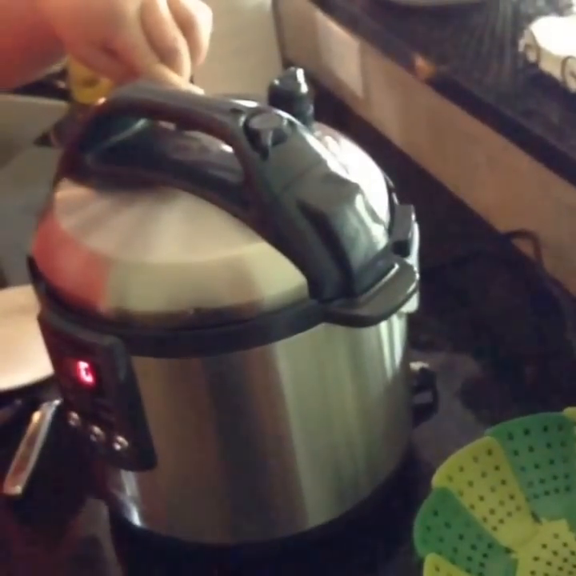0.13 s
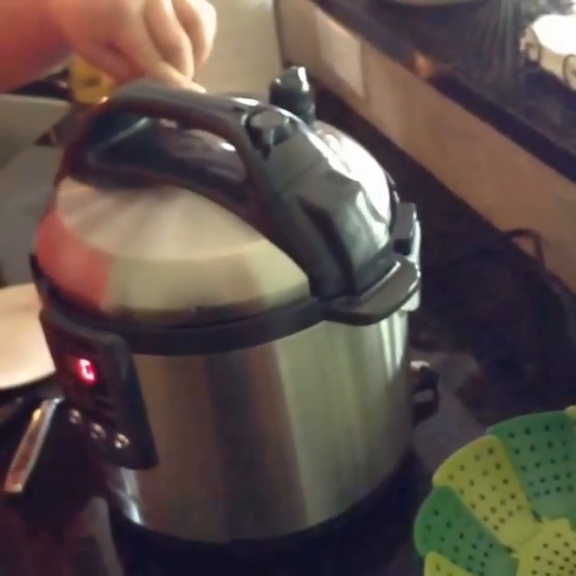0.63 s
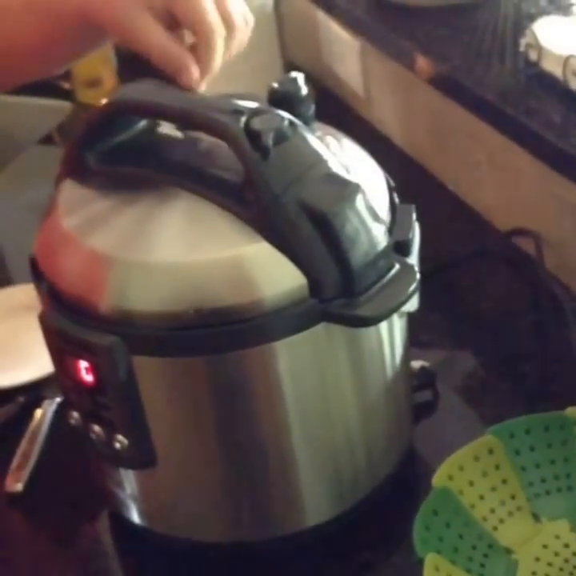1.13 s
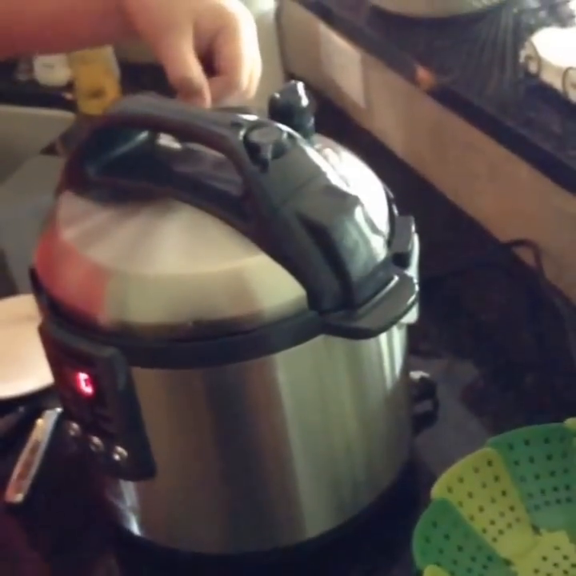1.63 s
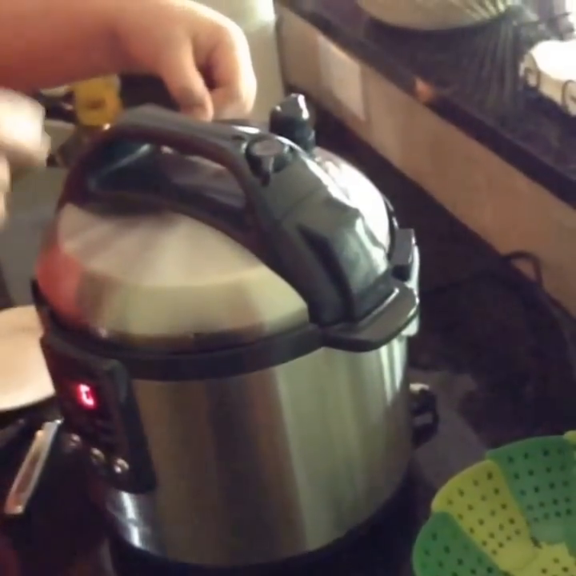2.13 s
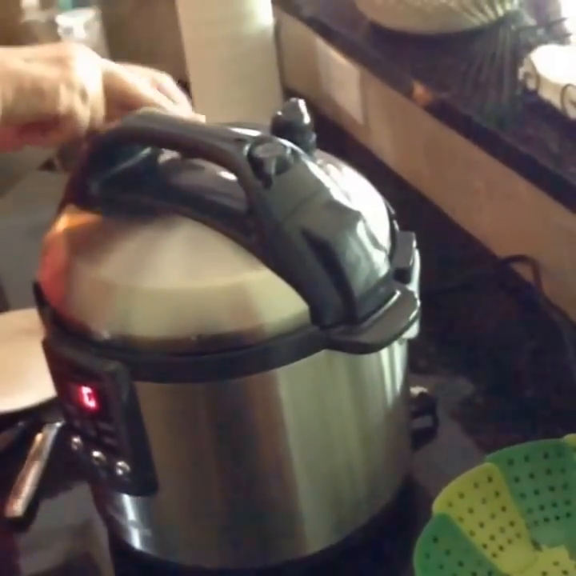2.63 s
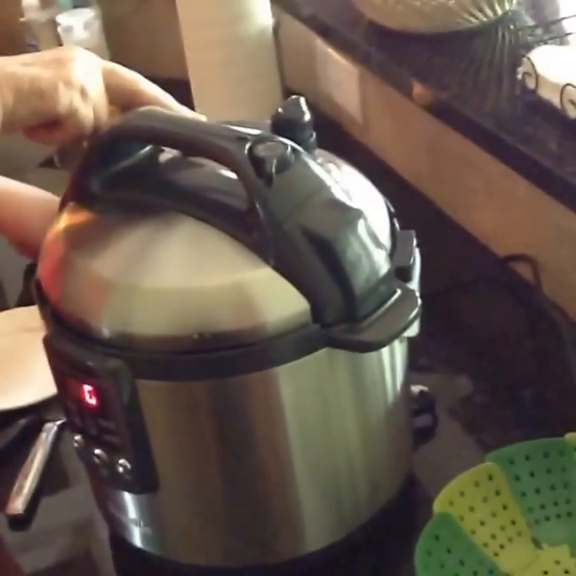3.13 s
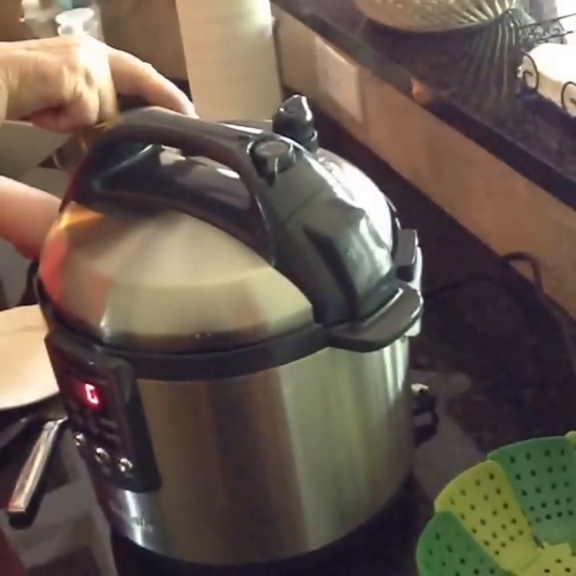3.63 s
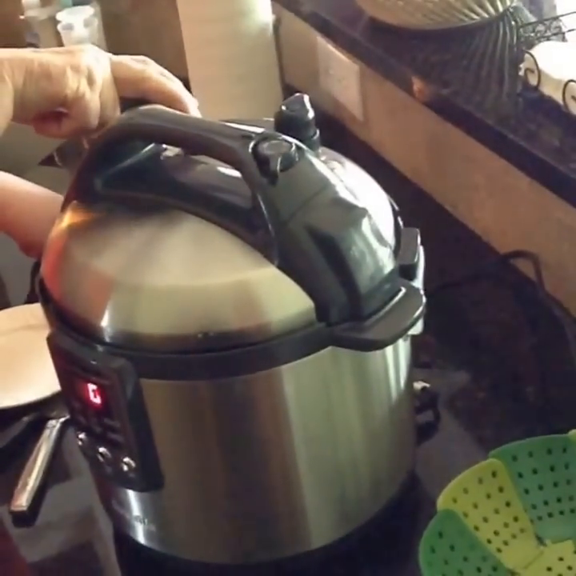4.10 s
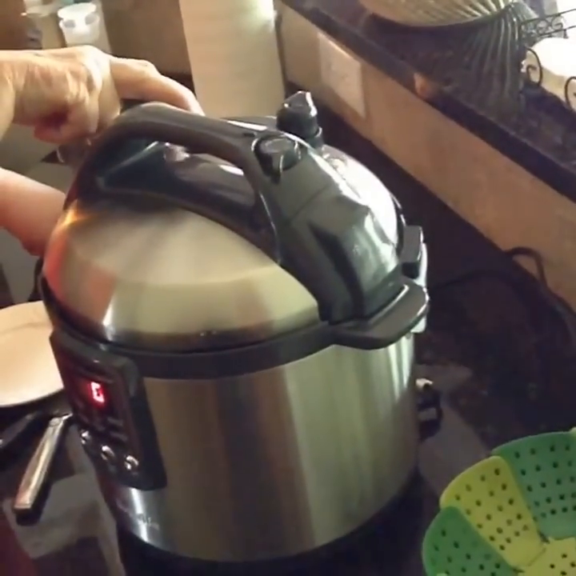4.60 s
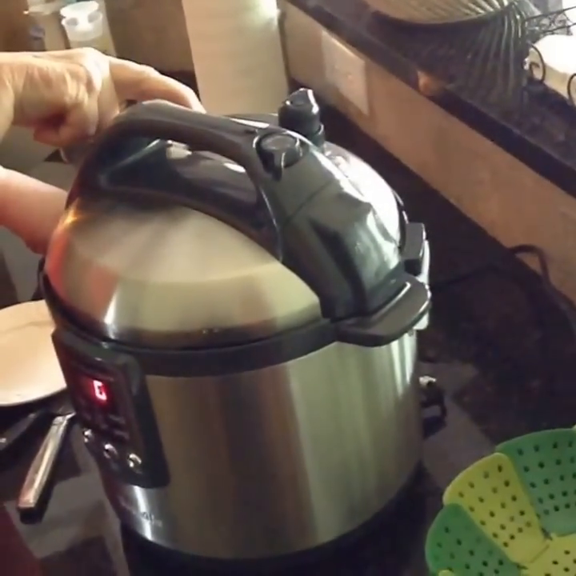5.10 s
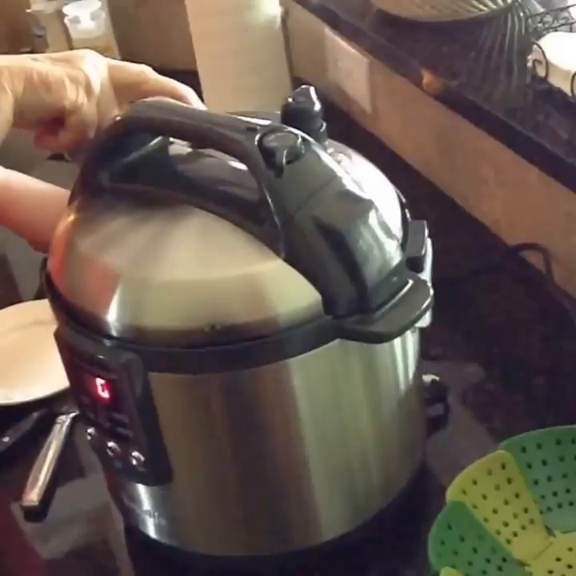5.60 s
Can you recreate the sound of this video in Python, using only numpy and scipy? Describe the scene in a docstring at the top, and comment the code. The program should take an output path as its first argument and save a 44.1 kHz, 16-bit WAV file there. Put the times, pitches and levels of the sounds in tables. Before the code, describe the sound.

Steam hisses loudly from a pressure cooker valve, cuts out twice with a squeak and metallic knocks, then bursts back and continues steadily.

```python
"""A kitchen counter, one microphone: steam blows out of the release valve of a pressure cooker.
The jet is turbulent noise coloured by the valve cap, heard direct, in swaying echoes and as hiss in the room.
Twice a hand shuts the valve for a moment: it squeaks the first time and knocks as ringing metal both times,
the hiss dies away in the room, then bursts out again. Wavering hum lines of an appliance and room tone lie below."""
import sys
import numpy as np
from scipy import signal
from scipy.fft import rfft, irfft, next_fast_len
from scipy.io import wavfile
from scipy.ndimage import uniform_filter1d, map_coordinates

SR = 44100
rng = np.random.default_rng(int(sys.argv[2]) if len(sys.argv) > 2 else 0)


def materialize(psi):
    """Save the field psi as 16-bit PCM at rate SR to the path in sys.argv[1].

    A 1-D psi becomes a single channel; in a 2-D psi each row is a channel.
    """
    bounded = np.clip(np.atleast_2d(psi).T, -1, 1)
    quanta = np.round(bounded * 32767).astype(np.int16)
    wavfile.write(sys.argv[1], SR, quanta)


def undo_db(level):
    """Turn decibels back into plain size, where 20 dB means ten times bigger."""
    steps = np.asarray(level, float) / 20
    return 10 ** steps


N = 253134   # length in samples

# spectrum of the steam jet: frequency_hz, relative_level_db (per Hz)
JET_SPECTRUM = [(300, -63), (600, -30), (940, -22.5), (1150, -23), (1720, -16.5), (2470, -15.5), (3200, -9),
                (3900, -5), (5000, -7.5), (6500, -6), (8100, -3), (9300, -4), (10300, -5), (11000, -17),
                (14000, -51)]
# resonances and notches of the valve cap, which sits differently at each opening:
# centre_hz, width_hz, first_opening_db, second_opening_db, third_opening_db
CAP_RESONANCES = [(2100, 76, 1, 0.5, 4.5), (2746, 89, 10.5, 2, 3.5), (3370, 150, 6, 6.5, 5),
                  (3530, 120, 3.5, 4.5, 0), (4010, 270, 1.5, 4, 4.5), (4470, 320, -6, -8.5, -10),
                  (4760, 92, -1, 8.5, 5.5), (5210, 300, 6, 2.5, 1.5), (5880, 310, 3, 4.5, 5.5),
                  (6380, 400, 0, -1.5, -1), (7480, 430, 6.5, 2, 3.5), (8160, 450, -1.5, 5, 5),
                  (8830, 150, 5, 3.5, 0.5), (9570, 220, -13, 3, -1.5), (9800, 240, 7, 6.5, 2.5)]
# spectrum of the steam reflected by the walls against the direct jet: frequency_hz, relative_level_db
WALL_SPECTRUM = [(800, 0), (1500, -0.5), (2600, 0), (3300, -0.5), (6500, 1), (10500, 2.5)]
# the valve stands open three times: opens_s, shuts_s, jet_db (before sag and surge),
# roar_lean_db (bands below 4.5 kHz, less in the bass), rush_lean_db (bands from 4.5 to 7 kHz)
VALVE_OPENINGS = [(-1, 1.052, -35.7, -1.5, -1.8), (1.349, 2.306, -35.4, -0.4, 0),
                  (2.568, 7, -35.6, -0.1, -1.4)]
# pent-up steam bursts out at each reopening: start_s, rise_s, hold_s, fall_s, boost_db
STEAM_SURGES = [(1.36, .045, .085, .07, 2.8), (2.575, .015, .1, .15, 2.3)]
# nearby surfaces that move with hand and microphone: delay_s, sway_s (rms), level_db
NEAR_ECHOES = [(.0013, .00004, -12), (.0031, 0.000056, -14), (.0067, .0001, -9)]
# reverberation time of the kitchen: frequency_hz, t60_s
ROOM_DECAY = [(200, 0.42), (1000, 0.56), (2000, 0.9), (3000, 0.38), (4000, 0.38), (6500, 0.44),
              (10000, 0.3)]
# spectrum of the room tone: frequency_hz, relative_level_db (per Hz)
ROOM_SPECTRUM = [(30, -30), (65, -22), (100, -8.5), (160, -2.5), (215, -4), (300, -1), (450, -8.5),
                 (700, -5.5), (1000, -12), (1500, -20), (2500, -24), (4600, -10), (8000, -23.5),
                 (11000, -20)]
# hum lines of the appliance: pitch_hz, level_db (before its wavering), wander_hz (rms)
HUM_LINES = [(121, -68, 1.25), (225.8, -67.5, 11.5)]
# squeak of the valve as it is turned: time_s, pitch_hz, level_db (both before the roughness)
SQUEAK_GLIDE = [(1.016, 613, -77), (1.019, 639, -49.5), (1.04, 548, -45.5), (1.06, 470, -47.5),
                (1.07, 440, -65)]
# the valve weight knocking on its seat: time_s, peak_db, favoured_centre_hz, bounces (count)
VALVE_KNOCKS = [(1.067, -32.5, 700, 0), (1.071, -39, 300, 0), (1.084, -37, 300, 3), (1.177, -43, 284, 0),
                (1.349, -45, 270, 0), (2.331, -35, 650, 0), (2.336, -38, 400, 2), (2.556, -33.5, 950, 0),
                (2.572, -34.5, 1330, 0), (2.593, -40, 400, 2)]
# modes that lid and valve ring with: pitch_hz, relative_level_db, t60_s
LID_MODES = [(212, -9, 0.075), (273, -2, 0.052), (333, -1.5, 0.047), (393, -7, 0.07), (542, -7, 0.06),
             (628, -6, 0.038), (723, -8.5, 0.055), (820, -9.5, 0.058), (918, -4, 0.03), (1125, -15, 0.022),
             (1420, -15, 0.028), (1790, -6, .025), (2500, -2, 0.017), (3800, 4, .015), (4500, -6, .01)]

ATTACK_S = .019   # the jet reaches full flow
# pressure falls: the whole jet sags, while the roar and still more the rush gain on the top treble
SAG_DB_PER_S, ROAR_LEAN_DB_PER_S, RUSH_LEAN_DB_PER_S = .42, .1, .65
OPENING_ROAR_DB, OPENING_RUSH_DB, OPENING_FADE_S = 7.5, 5, .125   # a half-open valve favours the middle
# the gap narrows before it seals: the jet swells, most in the middle, and eases at the very end
NARROWING_S, EASING_S, NARROW_DB, NARROW_ROAR_DB, NARROW_RUSH_DB = .05, .02, 2.2, 7, 5
BOUNCE_GAP_S, BOUNCE_LOSS_DB, BOUNCE_HZ = .018, 4, 560   # bounces follow evenly, weaker, near one centre


def at_hz(points, hz):
    """Reads a spectrum table on a log-frequency axis."""
    table_hz, values = np.transpose(points)
    return np.interp(np.log(hz), np.log(table_hz), values)


def rms_one(x):
    """Scales to rms 1."""
    return x / np.sqrt(np.mean(x ** 2) + 1e-20)


def drift(rate_hz):
    """Slow chance of spread 1: noise smoothed to about rate_hz changes a second."""
    pole = np.exp(-80 * np.pi * rate_hz / SR)   # one value every 40 samples
    noise = rng.standard_normal(N // 40 + 2002)
    slow = signal.lfilter([1], [1, -2 * pole, pole * pole], noise)[2000:]
    return np.interp(np.arange(N) / 40, np.arange(len(slow)), rms_one(slow))


def frequency_axis(size):
    """Frequencies of a real spectrum in Hz, kept just above zero for the logarithm."""
    return np.arange(size // 2 + 1) * SR / size + 1e-3


def coloured(gain_db, size):
    """White noise given a gain in dB per frequency; rms 1."""
    return rms_one(irfft(rfft(rng.standard_normal(size)) * undo_db(gain_db), size))


def jet_controls():
    """Flow, and the lean of roar and rush in dB: open, surge, sag with pressure, narrow, shut."""
    t = np.arange(N) / SR
    surge_db = 0
    for start, rise, hold, fall, db in STEAM_SURGES:
        surge_db = surge_db + np.interp(t, np.cumsum([start, rise, hold, fall]), [0, db, db, 0])
    flow, roar_db, rush_db = np.zeros((3, N))
    for opens, shuts, jet_db, roar_lean_db, rush_lean_db in VALVE_OPENINGS:
        is_open = (t >= opens) & (t <= shuts)
        attack = np.clip((t - opens) / ATTACK_S, 0, 1) ** 1.5
        fresh = np.exp(-np.abs(t - opens) / OPENING_FADE_S)
        narrow = np.interp(t - shuts, [-NARROWING_S - EASING_S, -EASING_S], [0, 1])
        easing = np.interp(t - shuts, [-EASING_S, 0], [1, -1])
        flow += is_open * undo_db(jet_db + NARROW_DB * narrow * easing) * attack
        roar_db += is_open * (roar_lean_db + OPENING_ROAR_DB * fresh + NARROW_ROAR_DB * narrow)
        rush_db += is_open * (rush_lean_db + OPENING_RUSH_DB * fresh + NARROW_RUSH_DB * narrow)
    flow = uniform_filter1d(flow * undo_db(surge_db - SAG_DB_PER_S * t), size=200)   # takes a few ms to seal
    return flow, roar_db + ROAR_LEAN_DB_PER_S * t, rush_db + RUSH_LEAN_DB_PER_S * t


def steam(shared_db, own_db, direct_db, diffuse_db):
    """Turbulent noise through the cap, in third-octave bands that flutter partly together.
    The room stores the power of each band and lets it die away as smoother hiss."""
    size = next_fast_len(N)
    hz = frequency_axis(size)
    flow, roar_db, rush_db = jet_controls()
    cap_db = sum(np.outer(db, 1 / (1 + (2 * (hz - centre) / width) ** 2))
                 for centre, width, *db in CAP_RESONANCES)
    jet_db = at_hz(JET_SPECTRUM, hz)
    # the cap colour changes 0.1 s after each shutting, while the jet is silent
    shut_times = [row[1] for row in VALVE_OPENINGS[:-1]]
    opening = np.searchsorted(shut_times, np.arange(size) / SR - .1)
    near = rfft(np.choose(opening, [coloured(jet_db + db, size) for db in cap_db]))
    # the walls return a mean of the three cap colours, much flattened
    far = rfft(coloured(jet_db + at_hz(WALL_SPECTRUM, hz) + 0.36 * cap_db.mean(axis=0), size))
    together_db = shared_db * (drift(19.0) + 0.23 * drift(40.0))
    direct, diffuse = 0, 0
    for centre in 250 * 2 ** np.arange(0, 5.7, 1 / 3):
        window = np.clip(1 - np.abs(3 * np.log2(hz / centre)), 0, 1)
        lean_db = roar_db if centre < 4500 else rush_db if centre < 7000 else 0
        lean_db = lean_db * np.clip(centre / 3300, 0, 1) ** 1.5   # the lowest bands hardly follow
        flutter_db = together_db + own_db * (drift(3.6) + drift(1.0))
        gain = flow * undo_db(flutter_db + lean_db)
        keep = undo_db(-120 / (at_hz(ROOM_DECAY, centre) * SR))   # power kept per sample: 60 dB down after t60
        stored = signal.lfilter([1 - keep], [1, -keep], gain ** 2 + 1e-18, zi=[gain[99] ** 2])[0]
        direct = direct + gain * irfft(near * window, size)[:N]
        diffuse = diffuse + np.sqrt(stored) * irfft(far * window, size)[:N]
    return undo_db(direct_db) * direct, undo_db(diffuse_db) * diffuse


def moving_echoes(x):
    """Adds short echoes whose delays sway, so that ripples drift through the hiss."""
    out = x.copy()
    for delay, sway, db in NEAR_ECHOES:
        read_at = np.arange(N) - SR * (delay + sway * drift(0.66))
        out += undo_db(db) * map_coordinates(x, [read_at], order=3, mode="mirror")
    return out


def kitchen(x):
    """Dense reflections: octave bands of noise, each dying at its own rate."""
    t = np.arange(SR // 2) / SR
    tail = 0
    for hz in 177 * 2. ** np.arange(7):
        band = signal.butter(2, [hz / np.sqrt(2), hz * np.sqrt(2)], "band", fs=SR, output="sos")
        noise = signal.sosfilt(band, rng.standard_normal(len(t)))
        tail = tail + noise * undo_db(-60 * t / at_hz(ROOM_DECAY, hz))
    tail = tail * (t > .004) / np.sqrt(np.sum(tail ** 2))   # nothing returns in the first 4 ms
    return signal.fftconvolve(x, tail)[:N]


def room_tone(level_db):
    """Steady coloured noise of the room at the given rms level."""
    size = next_fast_len(N)
    return undo_db(level_db) * coloured(at_hz(ROOM_SPECTRUM, frequency_axis(size)), size)[:N]


def appliance_hum():
    """Sine lines that waver a little in pitch and level."""
    out = np.zeros(N)
    for hz, db, wander_hz in HUM_LINES:
        phase = 2 * np.pi * np.cumsum(hz + wander_hz * drift(5.96)) / SR
        out += np.sqrt(2) * undo_db(db + 1.4 * drift(5.3)) * np.sin(phase)
    return out


def valve_squeak():
    """A falling tone with a weak octave above, rough through fast chance in pitch and level."""
    time_s, pitch_hz, level_db = np.transpose(SQUEAK_GLIDE)
    t = np.arange(N) / SR
    rough_hz = np.interp(t, time_s, pitch_hz) * (1 + 0.069 * drift(148.0))
    rough_db = np.interp(t, time_s, level_db, -200, -200) + 3.5 * drift(150.0)
    phase = 2 * np.pi * np.cumsum(rough_hz) / SR
    return np.sqrt(2) * undo_db(rough_db) * (np.sin(phase) + 0.2 * np.sin(2 * phase))


def ring(clicks, hz, t60):
    """A damped resonator: a unit click sets a sine of starting height 1 ringing."""
    radius, angle = undo_db(-60 / (t60 * SR)), 2 * np.pi * hz / SR
    return signal.lfilter([0, np.sin(angle)], [1, -2 * radius * np.cos(angle), radius ** 2], clicks + 1e-18)


def blows():
    """Lists every knock and its bounces: time_s, peak_db, favoured_centre_hz."""
    hits = []
    for s, db, centre_hz, bounces in VALVE_KNOCKS:
        for k in range(round(bounces) + 1):
            hits.append((s + BOUNCE_GAP_S * k, db - BOUNCE_LOSS_DB * k, BOUNCE_HZ if k else centre_hz))
    return hits


def valve_knocks():
    """Each blow is a click into every mode of lid and valve, favouring those near its centre."""
    out = np.zeros(N)
    click = np.eye(1, SR // 3)[0]
    modes = np.array([ring(click, hz, t60) for hz, db, t60 in LID_MODES])
    mode_hz, mode_db = np.transpose(LID_MODES)[:2]
    no_bass = signal.butter(2, 150, "high", fs=SR, output="sos")   # a small part radiates no deep bass
    for s, db, centre_hz in blows():
        chance_db = rng.normal(0, 2.5, len(LID_MODES))
        sign = rng.choice([-1, 1], len(LID_MODES))
        favour_db = -4.8 * np.log2(mode_hz / centre_hz) ** 2
        body = signal.sosfilt(no_bass, sign * undo_db(mode_db + chance_db + favour_db) @ modes)
        at = round(s * SR)
        out[at:at + len(body)] += undo_db(db) * body / np.max(np.abs(body))
    return out


def scene():
    """Jet and valve sound direct and by the walls, over the background; one channel doubled."""
    jet, hiss = steam(shared_db=0.55, own_db=0.53, direct_db=-0.5, diffuse_db=-2.0)
    metal = valve_squeak() + valve_knocks()
    reflections = kitchen(undo_db(-9.5) * jet + undo_db(-6.5) * metal)
    background = room_tone(level_db=-59.5) + appliance_hum()
    mono = moving_echoes(jet) + hiss + metal + reflections + background
    return np.array([mono, mono])


def top_cut(x):
    """Nothing passes above the cut-off."""
    return signal.sosfilt(signal.butter(12, 11660, fs=SR, output="sos"), x)


def record(dry):
    """The microphone drops the deep bass, and the top is cut steeply."""
    no_bass = signal.butter(2, 110, "high", fs=SR, output="sos")
    no_top = signal.ellip(12, .5, 65, 10720, fs=SR, output="sos")   # ripple dB, stopband dB, edge Hz
    mix = signal.sosfilt(no_top, signal.sosfilt(no_bass, dry))
    return top_cut(mix)


dry = scene()
out = record(dry)
materialize(out)
```